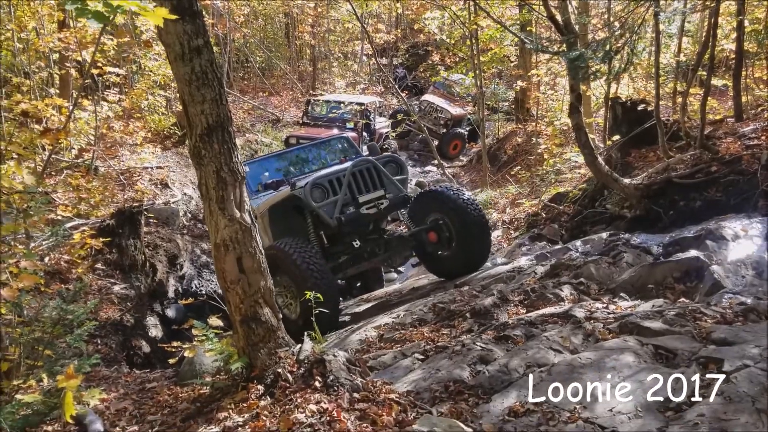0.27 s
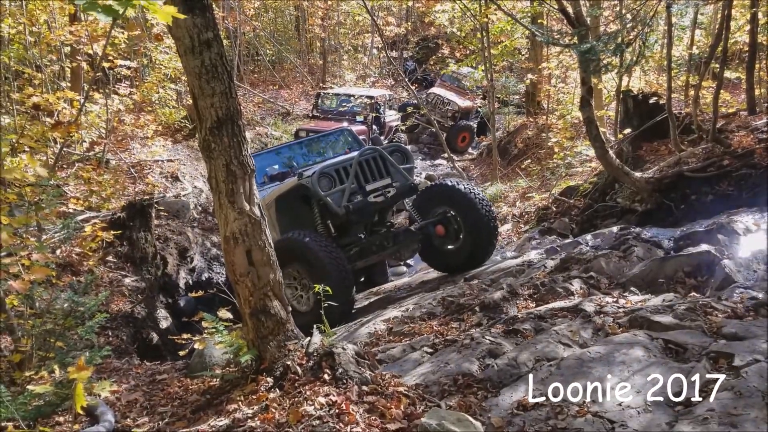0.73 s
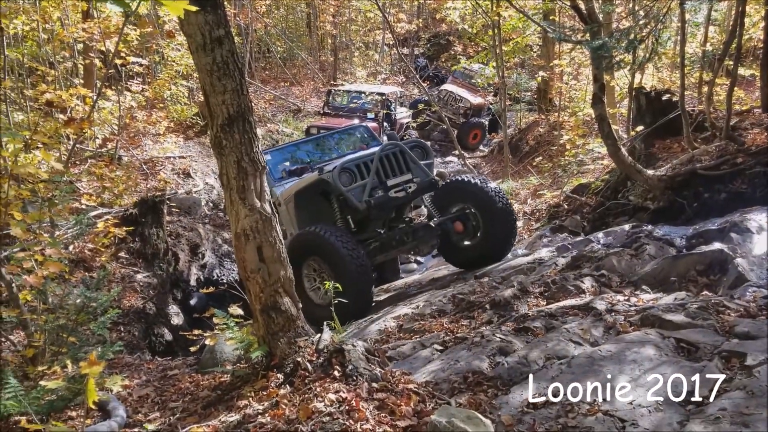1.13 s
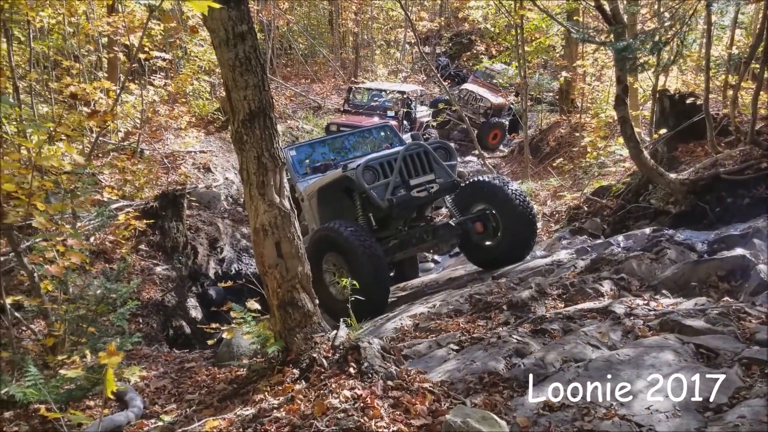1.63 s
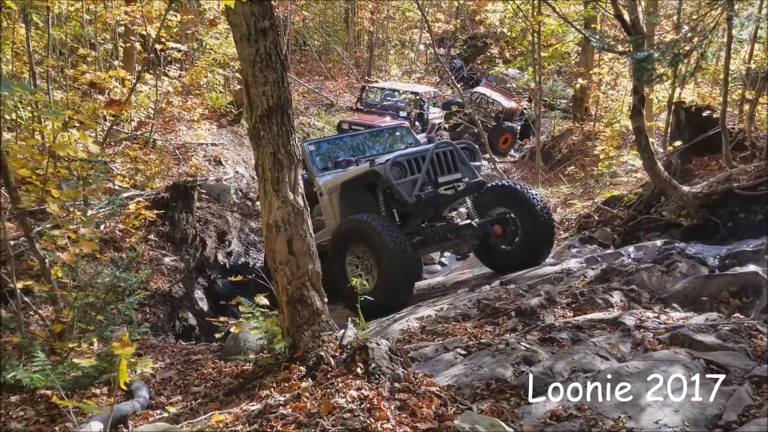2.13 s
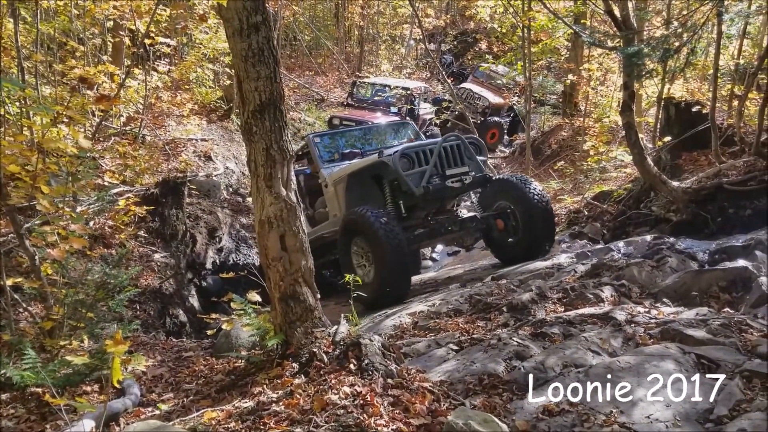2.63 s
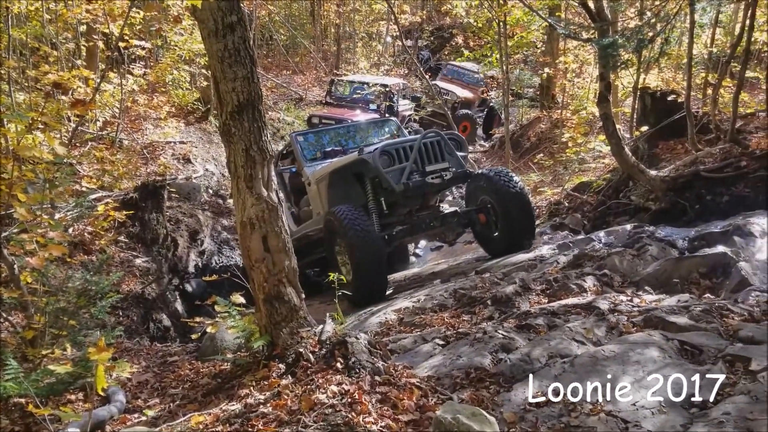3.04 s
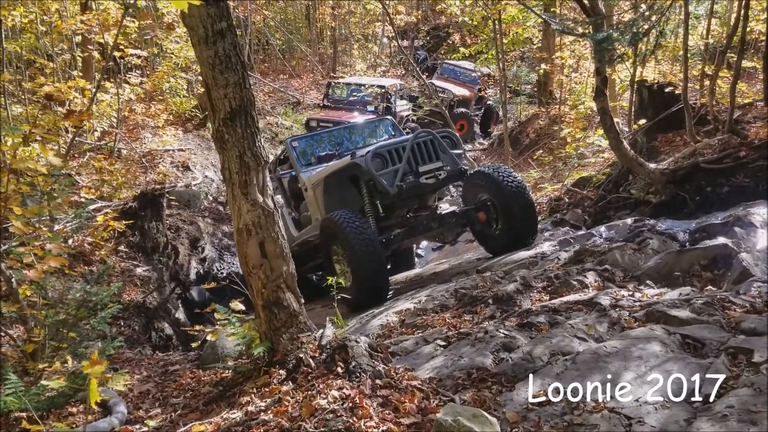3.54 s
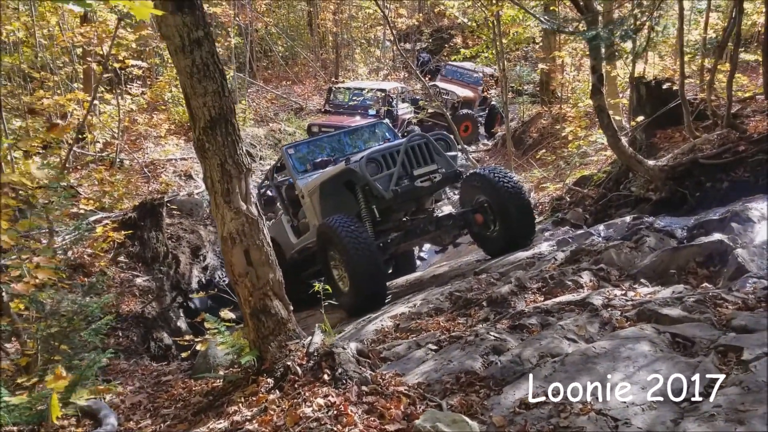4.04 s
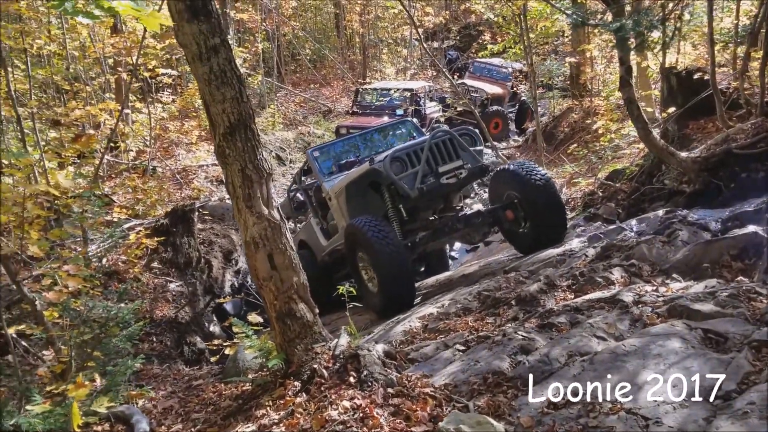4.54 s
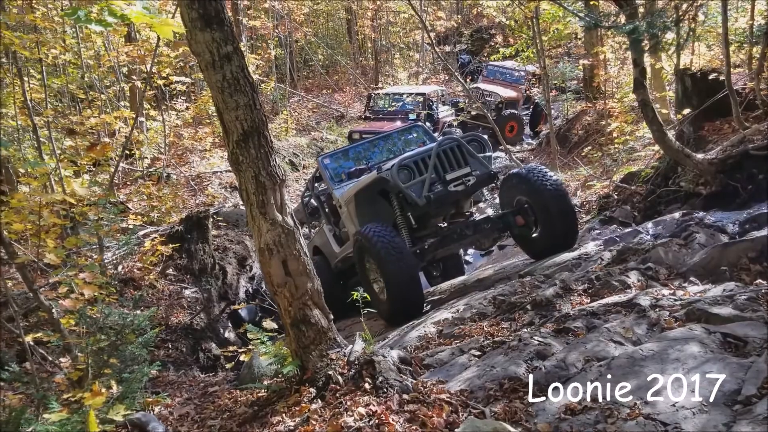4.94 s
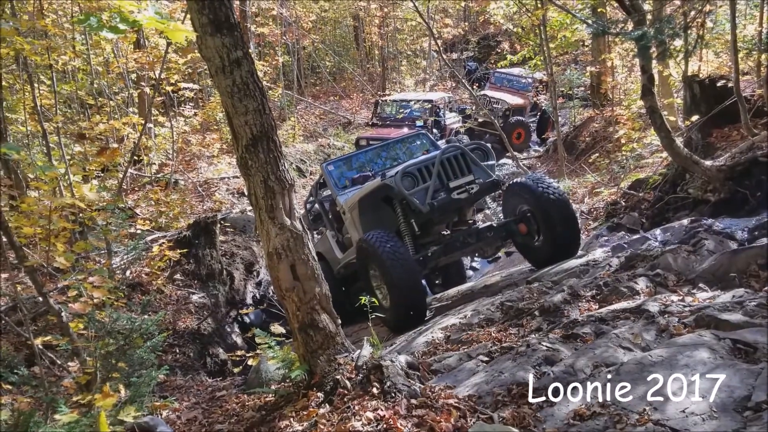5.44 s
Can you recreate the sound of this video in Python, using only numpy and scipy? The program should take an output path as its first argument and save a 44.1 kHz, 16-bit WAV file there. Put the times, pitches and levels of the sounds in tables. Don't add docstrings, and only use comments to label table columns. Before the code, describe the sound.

Deep, nearly overloaded exhaust boom with uneven cylinder burble and rushing intake and fan air, heard outdoors by a small stereo camera. Revs wobble, build, sag as the throttle closes, then surge again in a rising final pull. Another engine hums faintly behind; small twig snaps, low knocks and thin rubbery squeaks sit mostly under the engine.

```python
import sys
import numpy as np
from scipy import signal
from scipy.fft import rfft, irfft, next_fast_len
from scipy.io import wavfile
from scipy.ndimage import uniform_filter1d

SR = 44100
rng = np.random.default_rng(int(sys.argv[2]) if len(sys.argv) > 2 else 0)


def amplitude_ratio(level_db):
    exponent = np.asarray(level_db, float) / 20
    return 10 ** exponent


def store_wav(level_fs):
    pcm = np.round(np.clip(np.atleast_2d(level_fs), -1, 1) * 32767)
    wavfile.write(sys.argv[1], SR, pcm.T.astype(np.int16))


N = 250488
T = np.arange(N) / SR
M = next_fast_len(N + 4096)
HZ = np.maximum(np.fft.rfftfreq(M, 1 / SR), 1)

# time in seconds, firing rate in hertz.
REVS = [(0, 106.2), (.3, 122.4), (.55, 127), (.95, 101.5), (1.47, 121.2), (1.7, 141.4), (1.97, 150),
        (2.3, 182.9), (2.55, 197), (2.72, 181), (2.84, 150.7), (3.3, 105.7), (4.16, 61), (4.43, 122.2),
        (4.62, 147), (4.82, 165.8), (5.49, 269.8), (5.68, 246)]
# time in seconds, load in dB.
LOAD = [(0, 0), (0.249, 5), (.42, 0.9), (.65, -1.6), (.8, -3), (1.2, -1.5), (1.48, 2), (1.6, -2.3),
        (2.15, 3), (2.85, 1.5), (3.1, -4), (3.449, -4.5), (3.6, -11.5), (4.169, -10), (4.41, 7),
        (4.52, 0.2), (5.45, 7.5), (5.68, 1)]
# centre in seconds, length in seconds, extra boom in
# dB, extra burble in dB, extra hiss in dB.
LURCHES = [
    (0.017, 0.16, 10, 2, 1.8),
    (0.114, 0.24, 3, 3, 0.8),
    (3.194, 0.27, -6, 0.5, 1),
    (3.443, 0.27, 9, -2.5, 0.5),
    (3.824, .85, 0.7, -1.1, -3.5),
    (4.15, 0.16, 7.8, 1.3, 8),
    (4.377, 0.15, 2, -1, -1.5),
    (4.984, 0.44, -5.5, 2, 0),
    (5.222, 0.43, 2.5, 1, -0.1),
    (5.656, 0.34, -3.5, -6, 1),
]
# frequency in hertz, gain in dB.
PIPE = [(30, -31), (60, -17.5), (100, -12.5), (128, 1), (150, 0.5), (190, -8), (222, -14), (262, -2),
        (290, -5), (330, -14.5), (390, -22.5), (460, -39), (620, -22.5), (900, -72)]
# firing rate in hertz, level in dB.
BOOM = [(64, -29.5), (88, -39), (109, -27.5), (122, -7), (143, -5.5), (172, -13), (195, -12), (223, -28),
        (255, -15.5)]
# firing rate in hertz, level in dB.
OCTAVE = [(62, -5), (84, -20.5), (105, -1.5), (120, -12.5), (136, -7.5), (148, -9), (156, -22.5),
          (260, -15)]
# firing rate in hertz, level in dB.
BURBLE = [(62, -24.5), (90, -13), (110, -17), (127, -20.5), (143, -20.5), (170, -19.5), (200, -18),
          (260, -17)]
# level in dB of one multiple of that cycle, from the second up.
CYLINDERS = [1.5, -8, -14.5, -7.5, 2, -4.5, -40, -8, 4.5, -7, -4, -4.5, -7.5, -3, -39.5, -6.5, -2.5, -4, -4,
             0, -10, -8.5, 0.5, -4, -7.5, -2.5, -11, -5.5, -8.5, -11.5, -1]
# firing rate in hertz, level in dB.
SCATTER = [(60, -3), (105, -6), (140, -4), (190, -13), (260, -14)]
# frequency in hertz, level in dB per hertz.
ROAR = [(220, -18), (380, -1), (448, -11.5), (541, 1.5), (611, -6.5), (659, 2), (760, -4), (826, -1.5),
        (897, -6), (1240, -6.5), (1430, -12), (1580, -6), (1750, -14.5), (1930, -10), (2300, -16.5),
        (2990, -55), (5060, -120)]
# frequency in hertz, level in dB per hertz.
HISS = [(1180, -32), (2000, -12.5), (2440, -3), (3740, -7), (4330, -4), (4930, -9.5), (5550, -19),
        (6320, -11.5), (7700, -26), (9460, -16), (12700, -20.5), (15600, -28.5)]
# start in seconds, peak in dB, frequency in hertz, ring in seconds.
SNAPS = [
    (1.119, -10, 150, .03),
    (3.686, -49, 12000, .003),
    (3.807, -35, 3600, .006),
    (4.296, -8, 120, .04),
]
# start in seconds, length in seconds, from frequency in hertz, to frequency in hertz, level in dB.
SQUEAKS = [
    (4.085, .045, 11800, 11950, -63),
    (4.12, .04, 11600, 11600, -64),
    (4.075, .06, 9200, 9600, -63),
    (4.11, .16, 4800, 4800, -54),
    (1.9, .45, 5200, 5300, -53),
    (1.8, .22, 5450, 5450, -62),
    (4.88, .3, 4650, 5150, -53),
]
# time in seconds, frequency in hertz, level in dB.
BEHIND = [(0, 72.54, -29.5), (0.598, 64, -31), (1.9, 86.04, -32.5), (2.648, 84, -25), (3.298, 52.43, -50.5),
          (4.15, 68.35, -28), (4.401, 53.1, -37), (5.05, 90, -36), (5.68, 94.2, -27)]
# frequency in hertz, level in dB, steady share, waver per second.
WHINE = [(555, -51, 1.9, 5), (651, -60, .3, 30), (1112, -58, 1.6, 8), (1570, -56, .2, 60),
         (530, -52, 0, 40)]
# frequency in hertz, level in dB per hertz.
RUMBLE = [(18, -32.5), (33, -26), (42, -0.5), (55, -7.5), (85, 2), (115, -8)]
# frequency in hertz, level difference in dB.
TILT = [(30, 0), (110, -.7), (200, -1.1), (380, -1.9), (700, -.7), (1290, -1.5), (2380, 3.5), (4400, 11),
        (8120, 8), (15000, 2.5)]
LIKENESS = [(100, .999), (400, 1), (700, 0.9), (1200, .8), (2200, 0.4), (4000, 0.03), (15000, 0)]
LEAD = [(30, .05), (125, .06), (300, .16), (600, .45), (1120, .9), (1720, 2), (2330, 2.3), (3300, 5)]


def read(table, hz):
    f, v = np.transpose(table)
    return np.interp(np.log(hz), np.log(f), v)


def colour(x, table):
    cepstrum = irfft(np.log(amplitude_ratio(read(table, HZ))), M)
    cepstrum[1:M // 2] *= 2
    cepstrum[M // 2 + 1:] = 0
    return irfft(rfft(x, M) * np.exp(rfft(cepstrum)), M)[:N]


def even(x, span_s):
    k = int(span_s * SR)
    power = uniform_filter1d(uniform_filter1d(x ** 2, k), k)
    return x / np.sqrt(power + 1e-12)


def walk(rate):
    k = int(SR / rate)
    held = np.repeat(rng.standard_normal(N // k + 1), k)
    return 1.28 * uniform_filter1d(uniform_filter1d(held, k), k)[:N]


def boom(hz, turns, boom_db, load_db):
    pipe_db = read(PIPE, 2 * hz) - read(PIPE, hz)
    octave_db = read(OCTAVE, hz) + 0.37 * load_db + pipe_db
    octave = amplitude_ratio(np.minimum(octave_db, 12) + 0.8 * walk(9)) * np.sin(4 * np.pi * turns + 1.4)
    tone = np.sin(2 * np.pi * turns) + octave
    return np.sqrt(2) * amplitude_ratio(boom_db + 0.81 * walk(22)) * tone


def burble(hz, turns, burble_db):
    pattern = np.zeros(N)
    for multiple, db in enumerate(CYLINDERS, 2):
        angle = 2 * np.pi * (multiple * turns / 8 + rng.random())
        pattern += amplitude_ratio(db + 2.77 * walk(5.2)) * np.sin(angle)
    at = np.flatnonzero(np.diff(np.floor(turns)) > 0)
    pulses = np.zeros(N)
    pulses[at] = amplitude_ratio(read(SCATTER, hz[at])) * SR / hz[at] * rng.standard_normal(len(at))
    pulses = signal.sosfilt(signal.butter(6, 800, fs=SR, output="sos"), pulses)
    return amplitude_ratio(burble_db) * even(colour(pattern + pulses, PIPE), span_s=0.07)


def rush(table, throb, flicker_db):
    low, high = table[0][0], table[-1][0]
    noise = rfft(rng.standard_normal((2, M))) * amplitude_ratio(read(table, HZ)) * (HZ > low) * (HZ < high)
    out = 0
    for centre in low * 2 ** np.arange(0, np.log2(high / low) + 1):
        band = np.cos(np.pi / 2 * np.clip(np.log2(HZ / centre), -1, 1)) ** 2
        out = out + amplitude_ratio(flicker_db * walk(10)) * irfft(noise * band, M)[:, :N]
    out = ports(*(out * throb))
    return out / np.sqrt(np.mean(out.mean(axis=0) ** 2))


def roar(load_db, gusts, puff):
    return amplitude_ratio(-35 + load_db) * rush(ROAR, gusts * (1 + 0.086 * puff), flicker_db=1.0)


def hiss(load_db, scrub_db, gusts, puff):
    level_db = -46 + 0.86 * load_db + scrub_db + 0.73 * walk(7)
    return amplitude_ratio(level_db) * rush(HISS, gusts * (1 + 0.066 * puff), flicker_db=0.9)


def snaps():
    out = np.zeros(N)
    for start, db, hz, ring in SNAPS:
        age = np.maximum(T - start, 0)
        out += amplitude_ratio(db) * np.sin(2 * np.pi * hz * age) * np.exp(-np.log(1000) * age / ring)
    return out


def squeaks():
    out = np.zeros(N)
    for start, length, from_hz, to_hz, db in SQUEAKS:
        done = np.clip((T - start) / length, 0, 1)
        angle = 2 * np.pi * np.cumsum(from_hz + (to_hz - from_hz) * done) / SR
        whistle = walk(300) * np.sin(angle) + walk(300) * np.cos(angle)
        out += amplitude_ratio(db) * np.sin(np.pi * done) * whistle
    return out


def behind():
    time, hz, db = np.transpose(BEHIND)
    turns = np.cumsum(np.interp(T, time, hz) * (1 + 0.018 * walk(7))) / SR
    hum = amplitude_ratio(np.interp(T, time, db) + 1.0 * walk(8.7)) * np.sin(2 * np.pi * turns)
    fan = np.zeros(N)
    for hz, db, steady, rate in WHINE:
        angle = 2 * np.pi * hz * T
        fan += amplitude_ratio(db) * ((steady + 0.6 * walk(rate)) * np.sin(angle) + 0.6 * walk(rate) * np.cos(angle))
    return np.sqrt(2) * hum + fan


def rumble():
    return amplitude_ratio(-31) * rush(RUMBLE, 1, flicker_db=0.0)


def ports(x, other=None):
    left = right = rfft(x, M)
    if other is not None:
        like = np.clip(read(LIKENESS, HZ), 0, 1)
        right = like * left + np.sqrt(1 - like ** 2) * rfft(other, M)
    tilt = amplitude_ratio(read(TILT, HZ) / 2) * np.exp(0.5j * read(LEAD, HZ))
    return irfft(np.array([left * tilt, right / tilt]), M)[:, :N]


def follow(curve, lag_s):
    return uniform_filter1d(np.interp(T, *np.transpose(curve)), size=int(lag_s * SR))


def lurches():
    extra = np.zeros((3, N))
    for centre, length, *extra_db in LURCHES:
        hump = np.sin(np.pi * np.clip((T - centre) / length + 0.5, 0, 1)) ** 2
        extra += np.outer(extra_db, hump)
    return extra


def scene():
    hz = follow(REVS, lag_s=0.11)
    load_db = follow(LOAD, lag_s=0.04)
    extra_boom_db, extra_burble_db, scrub_db = lurches()
    turns = np.cumsum(hz * (1 + 0.003 * walk(25))) / SR
    puff = np.cos(2 * np.pi * turns) + 0.9 * np.cos(np.pi * turns / 2)
    gusts = amplitude_ratio(1.2 * walk(8))
    boom_db = read(BOOM, hz) + 0.3 * load_db + extra_boom_db
    burble_db = read(BURBLE, hz) + 0.59 * load_db + extra_burble_db
    exhaust = boom(hz, turns, boom_db, load_db) + burble(hz, turns, burble_db)
    air = roar(load_db, gusts, puff) + hiss(load_db, scrub_db, gusts, puff)
    return ports(exhaust + snaps() + squeaks() + behind()) + air + rumble()


def top_cut(x):
    return signal.sosfilt(signal.butter(12, 15710, fs=SR, output="sos"), x)


def record(dry):
    rounded = dry / (1 + np.abs(dry) ** 14) ** (1 / 14)
    return top_cut(rounded)


dry = scene()
out = record(dry)
store_wav(out)
```